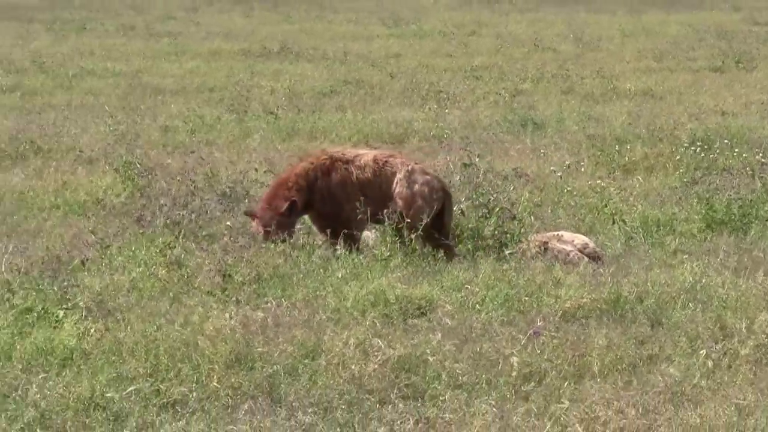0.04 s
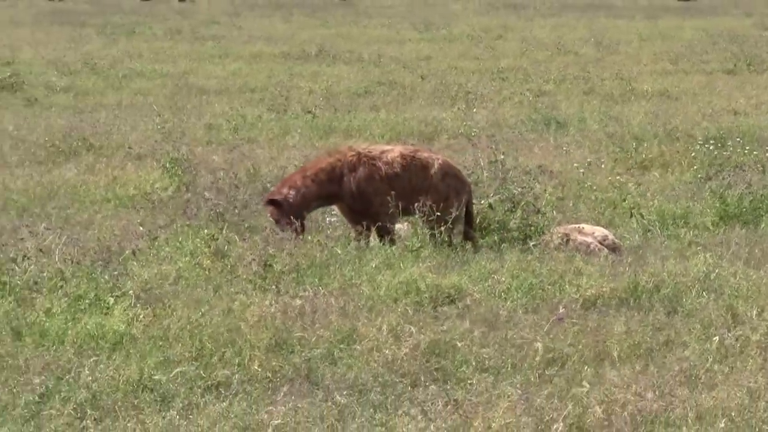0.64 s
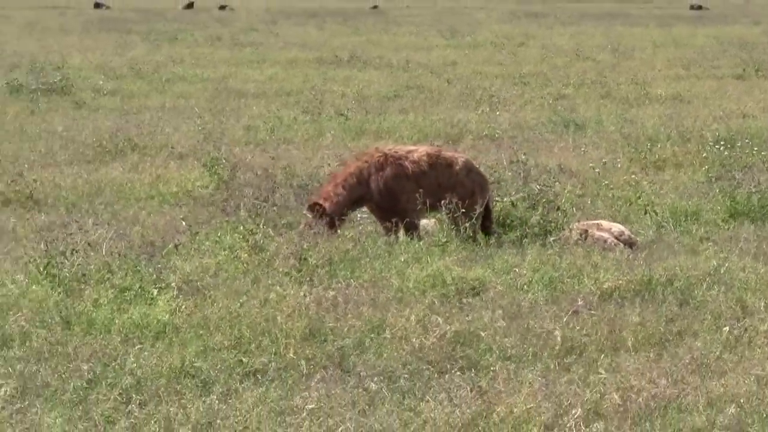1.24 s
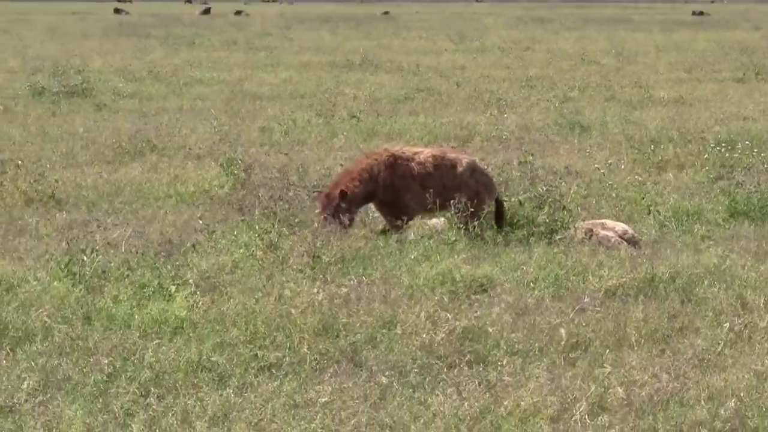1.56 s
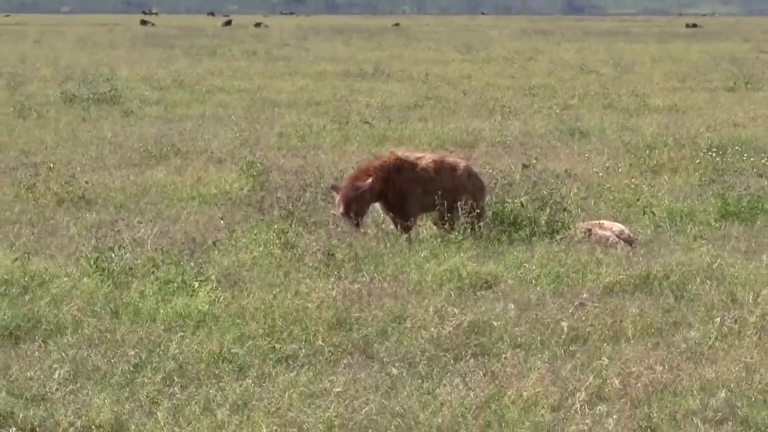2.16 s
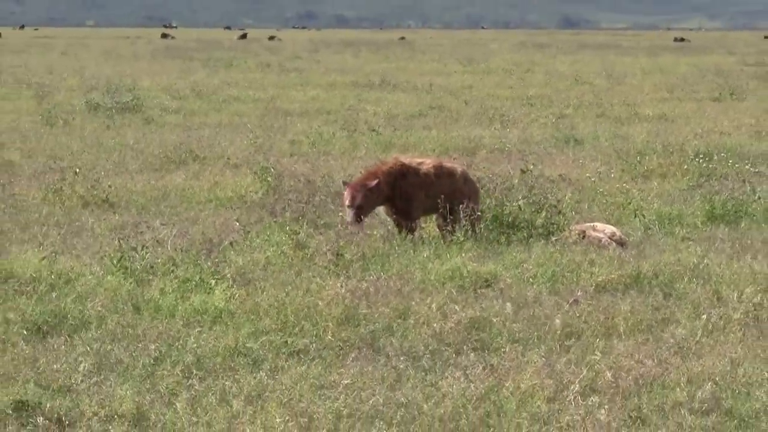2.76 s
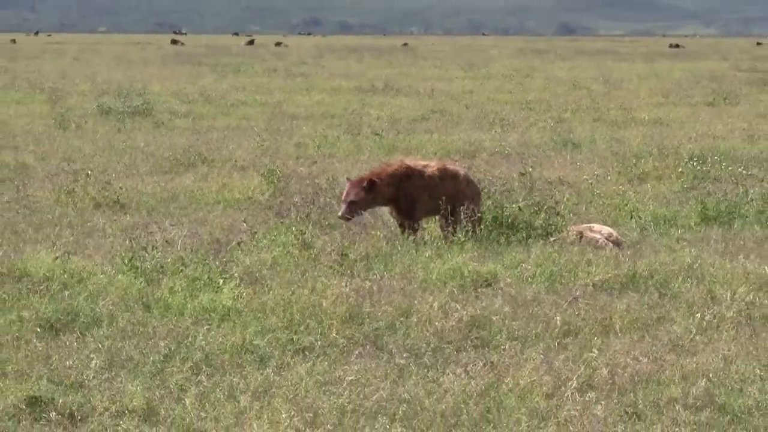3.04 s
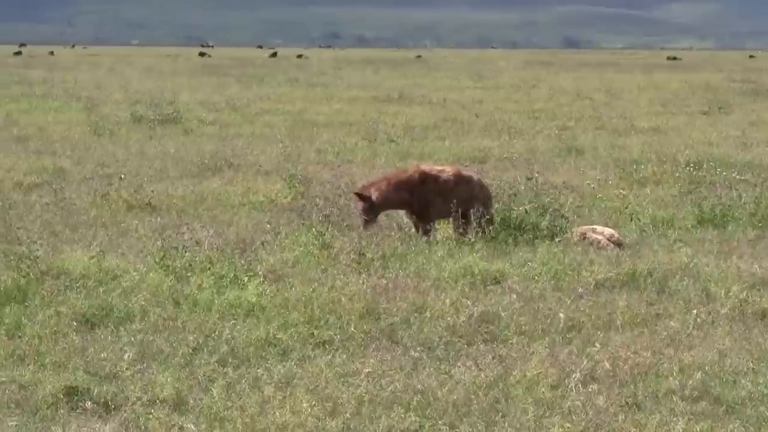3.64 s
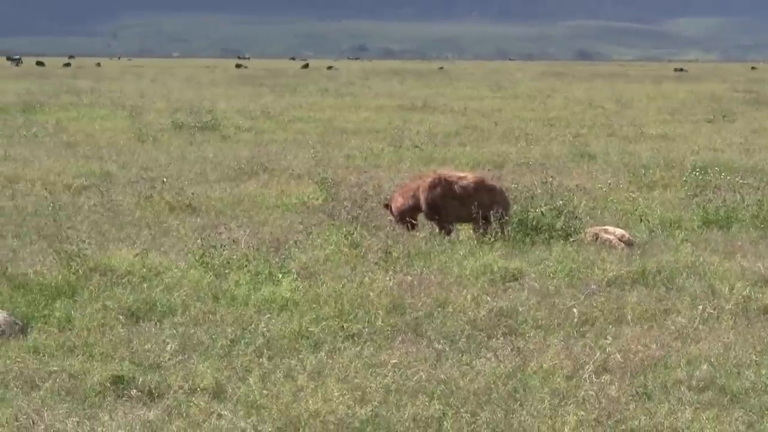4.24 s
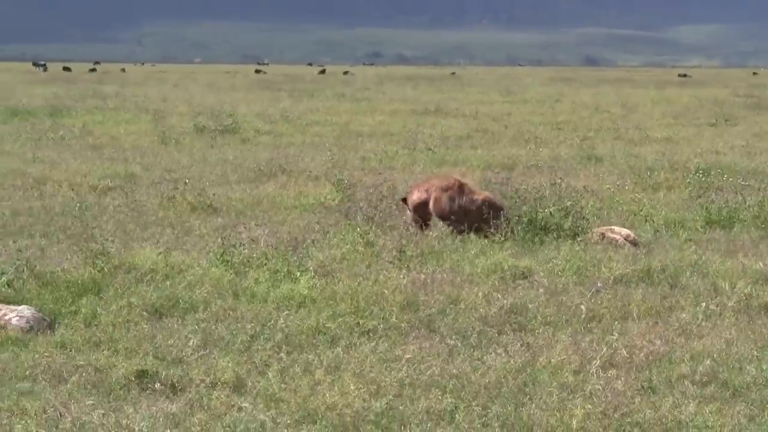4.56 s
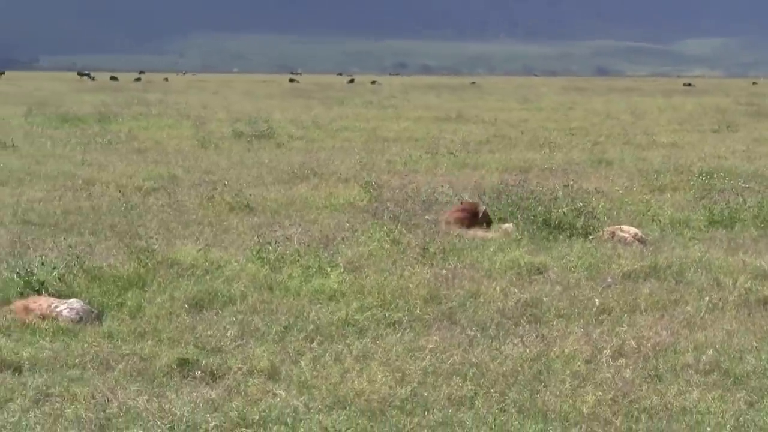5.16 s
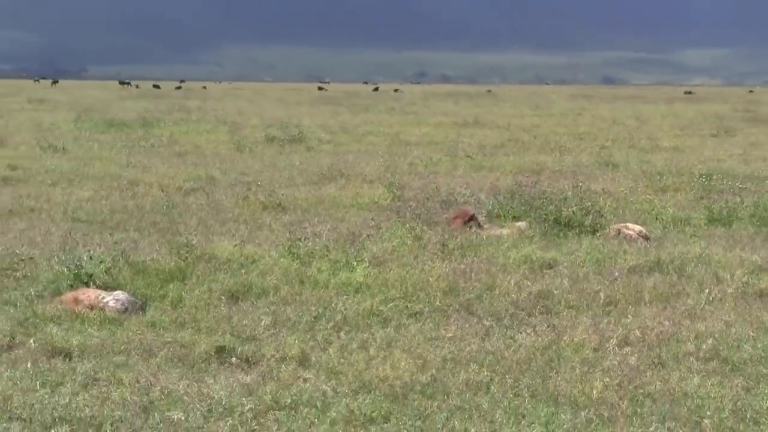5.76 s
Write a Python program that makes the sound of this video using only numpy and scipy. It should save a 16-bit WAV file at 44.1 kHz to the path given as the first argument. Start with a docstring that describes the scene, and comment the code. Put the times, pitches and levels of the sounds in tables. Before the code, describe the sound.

A soft, steady hush of air lies over open grassland. A short, low puff of wind bumps the microphone at the start, while a small, distant bird repeats a faint, high chirp until about 0.7 seconds. Weak puffs and a few thin pips follow around 1 second. From 1.5 to 2.2 seconds, gusts buffet the microphone with low flaps that jump between left and right, loudest just after 2 seconds. In the lull, the chirps return, about six a second until 3.4 seconds, joined by a long falling whistle near 2.7 seconds. More gusts flap from 3.4 to 3.7 and around 4.2 seconds, with a faint trill behind them. From about 4.5 seconds the wind drops to small puffs, and dry grass rustles and ticks very faintly. A short trill and another distant falling whistle come near 5.7 seconds.

```python
"""Wind and birds on open grassland

Light gusts carry eddies past the two ports of a camera microphone, buffeting them with low flaps.
Far off, small birds sing nearly pure tones: V-shaped chirps, short trills and long falling whistles.
Now and then dry grass blades rub together in a rustle, over the soft hush of air on the plain."""
import sys
import numpy as np
from scipy import signal
from scipy.fft import rfft, irfft
from scipy.io import wavfile
from scipy.ndimage import uniform_filter1d

SR = 44100
rng = np.random.default_rng(int(sys.argv[2]) if len(sys.argv) > 2 else 0)


def master(y):
    """Save y as 16-bit WAV."""
    cut = np.clip(np.atleast_2d(y).T, -1, 1)
    pcm = np.round(cut * 32767)  # scale
    wavfile.write(sys.argv[1], SR, pcm.astype(np.int16))


N = 264600
T = np.arange(N) / SR


def wind(turn_rad=0.99, balance_db=0.64, low_cut_hz=70):
    """Two close ports become stereo: lifting their difference and turning its phase swells the wind."""
    # Stereo widening. Each row: frequency in Hz, lift of the ports' difference in dB.
    widening = [(25, -19), (60, -5.5), (125, -1), (250, 6.5), (500, 7), (1000, 1), (2000, 4)]
    ease = np.clip(np.minimum(T, T[-1] - T) / .005, 0, 1)
    pressure = (turbulence() + eddies()) * ease
    low_cut = signal.butter(2, low_cut_hz, "high", fs=SR, output="sos")
    left, right = signal.sosfilt(low_cut, pressure) * ease
    side = colour((left - right) / 2, widening)
    side = np.real(signal.hilbert(side) * np.exp(-1j * turn_rad))
    balance = undb(np.array([[balance_db], [-balance_db]]) / 2)
    return stereo((left + right) / 2, side) * balance


def turbulence(trim_db=4.5, speed_share=.16, flap_db=1.95, flap_hz=90, strong_db=-31):
    """Air carries a frozen field of eddies past each port: faster air is louder and higher."""
    # Rumble of a strong gust. Each row: frequency in Hz, relative level in dB.
    spectrum = [(20, -7), (45, -21), (80, 6), (160, 5.5), (290, -4), (450, -19.5), (680, -32.5),
                (1100, -35), (2000, -76.5)]
    force_db = gust_db() + flap_db * walk(flap_hz)
    speed = undb(speed_share * (force_db - strong_db))
    travel = np.cumsum(speed) % N
    field = unit(colour(rng.standard_normal((2, N)), spectrum))
    ports = np.array([np.interp(travel, np.arange(N), air) for air in field])
    return undb(force_db + trim_db) * ports


def gust_db(attack_s=.007, release_s=.012, wake_db=-19, wake_s=.06, breeze_db=-73):
    """Force of the wind: puffs rise, hold and die, leaving a wake of stirred air over a steady breeze."""
    # Puffs at the microphone. Each row: start in seconds, hold in seconds, force in dB.
    puffs = [(0, 0.043, -37.5), (0.128, 0.0201, -51), (0.204, 0.015474, -50), (0.271, 0.03958, -52),
             (0.718, 0.064, -57), (0.804, .042, -47), (0.948, 0.057, -51), (1.522, 0.02459, -37),
             (1.575, 0.046, -33), (1.668, .07, -40), (1.927, 0.02458, -33), (1.985, .185, -32),
             (2.212, 0.089, -48), (2.519, .075, -48), (3.24, 0.02014, -55), (3.394, .018, -40),
             (3.467, 0.0223, -39), (3.536, 0.0464, -36), (3.59, 0.11, -33), (3.72, 0.024, -42),
             (3.924, 0.0209, -51), (4.003, 0.01553, -54), (4.148, 0.065, -33), (4.259, 0.1, -38),
             (4.629, 0.015, -42.5), (5.07, 0.0216, -47.5), (5.271, 0.055, -42.5), (5.411, .028, -43),
             (5.853, 0.0207, -49), (5.918, 0.039, -40)]
    power = undb(breeze_db) ** 2
    for start, hold, db in puffs:
        before, after = np.maximum(start - T, 0), np.maximum(T - start - hold, 0)
        puff = np.exp(-before / attack_s - after / release_s)
        wake = undb(wake_db) * np.exp(-before / attack_s - after / wake_s)
        power = power + (undb(db) * np.maximum(puff, wake)) ** 2
    return 10 * np.log10(power)


def eddies(trim_db=4.0, skirt=0.58):
    """Each strong eddy slaps one port with a swing between suction and push as it crosses."""
    # The strongest eddies. Each row: time in seconds, peak in dB before the trim, pitch in Hz,
    # port (1 left, -1 right).
    slaps = [(.835, -33, 119.9, 1), (.967, -31.5, 120, -1), (1.586, -23.5, 261, 1), (1.594, -23.5, 196, -1),
             (1.935, -15.5, 183, 1), (2.028, -20.5, 289.6, 1), (2.081, -18, 287.5, 1),
             (2.086, -11, 210, -1), (2.105, -23.5, 460, -1), (2.108, -11.5, 263, -1), (2.1261, -7, 340, -1),
             (2.156, -10, 241.5, -1), (3.403, -28.5, 182, -1), (3.586, -31, 275, 1),
             (3.647, -19.5, 310, -1), (3.666, -16.5, 204, -1), (3.688, -19, 187, 1),
             (4.154, -19.5, 323.6, 1), (4.155, -11.5, 149.5, -1), (4.167, -14, 132, 1),
             (4.172, -20, 275, -1), (4.31, -24, 249, 1)]
    ports = np.zeros((2, N))
    for at, db, hz, port in slaps:
        near = slice(*np.searchsorted(T, [at - .03, at + .03]))
        phase = np.pi * hz * (T[near] - at)
        push_pull = phase / (1 + phase ** 2 / (2 * skirt)) ** (2 * skirt + 1)
        ports[int(port < 0), near] += undb(db + trim_db) * push_pull / push_pull.max()
    return ports


def birds(chirp_db=-4, trill_db=-2.5, whistle_db=-4.0):
    """Three kinds of song from different distances, over a faint twitter."""
    return (undb(chirp_db) * far_away(chirps(), scatter_db=1.5, t60=0.087)
            + undb(trill_db) * far_away(trills(), scatter_db=-17, t60=0.18)
            + undb(whistle_db) * far_away(whistles(), scatter_db=-7.0, t60=0.13)
            + far_away(twitter(), scatter_db=-2.0, t60=0.87))


def chirps():
    """A bird repeats a chirp that dives in pitch and springs back up."""
    # The V shape. Each row: seconds from its lowest point, pitch in Hz, relative level in dB.
    shape = [(-.032, 5600, -13), (-.019, 4850, -14), (-.008, 4460, -7), (0, 4030, -1), (.007, 4270, -5.5),
             (.013, 5300, -4), (.021, 5850, -18), (.03, 5340, -8), (.036, 5100, -32)]
    # The chirps. Each row: time in seconds, relative level in dB, pitch ratio.
    notes = [(0.035, -61.5, 1.08), (.21, -66, 1.02), (0.376, -67.5, 1.1), (0.544, -61, 1.02),
             (.713, -65.5, 1.03), (1.918, -74.5, 1.3), (2.132, -69.5, 1.02), (2.314, -62.5, 1.0),
             (2.496, -62.5, 1), (2.661, -57.5, 1.01), (2.84, -60, 0.99), (3.009, -58, 0.99),
             (3.187, -63, 1), (3.372, -61.5, 1.06)]
    return series(shape, notes, quaver_hz=70.3)


def trills(last_gap_s=.054, slowing=1.1, rise_db=0.5):
    """Falling pips, alone or in runs where each gap is longer than the last and each pip louder."""
    # One pip. Each row: seconds from its middle, pitch in Hz, relative level in dB.
    shape = [(-.014, 4000, -27), (-.005, 3983, 0), (.002, 3920, 1), (.01, 3680, -1), (.017, 3450, -23)]
    # The runs. Each row: last pip's time in seconds, pip count, relative level in dB, pitch ratio.
    runs = [(.755, 1, -66.5, 1.0), (.902, 3, -72.5, .99), (1.177, 1, -71.5, 1.03), (1.876, 5, -72.5, 1.02),
            (3.849, 7, -67, .99), (4.729, 2, -70, 1.02), (5.156, 1, -68, 1.03), (5.815, 3, -70, 0.99)]
    pips = []
    for last_s, count, db, ratio in runs:
        back = np.arange(round(count))  # counted from the last pip
        gaps = last_gap_s / slowing ** back
        pips += [(last_s - gaps[:k].sum(), db - rise_db * k, ratio) for k in back]
    return series(shape, pips, quaver_hz=15)


def whistles():
    """A bird sings slurred, mostly falling whistles; a U-shaped note leads into the last."""
    # The lead-in note. Each row: time in seconds, pitch in Hz, relative level in dB.
    lead_note = [(5.641, 5420, -73), (5.652, 4410, -58), (5.662, 4350, -59.5), (5.686, 4266, -58),
                 (5.696, 5300, -68)]
    # The slurs. Each row: start and length in seconds, first and last pitch in Hz,
    # relative level in dB, quaver depth in Hz.
    slurs = [(.125, 0.078, 5850, 4650, -74, 30), (.228, .045, 4650, 3630, -72, 21),
             (1.53, 0.1, 3020, 3060, -77, 17), (2.727, .195, 4920, 3620, -64, 125),
             (2.875, 0.23, 3350, 3050, -68.5, 46), (3.08, 0.073, 3020, 2780, -72, 30),
             (3.075, .065, 3620, 3490, -71, 16.5), (5.71, 0.19, 5600, 3870, -65.5, 89)]
    lead = bird_note(*np.transpose(lead_note), quaver_hz=np.full(len(lead_note), 20))
    return lead + sum(slur(*row) for row in slurs)


def slur(start, length, first_hz, last_hz, db, quaver_hz, bend=1.5, ends_db=-8, waver=0.0072):
    """A wavering whistle glides fast, then levels out; it swells and quavers most in the middle."""
    progress = np.linspace(0, 1, 21)
    stray, flicker = rng.standard_normal((2, len(progress)))
    glide = np.expm1(-bend * progress) / np.expm1(-bend)
    hz = (first_hz + (last_hz - first_hz) * glide) * (1 + waver * stray)
    edge = (2 * progress - 1) ** 2
    level_db = db + ends_db * edge - 0.8 * flicker
    return bird_note(start + length * progress, hz, level_db, quaver_hz * (1 - edge / 2))


def twitter(count=40, level_db=-82, spread_db=3, low_hz=2400, high_hz=4100, longest_s=0.083, slide=0.13):
    """The farthest birds: stray short slurs that barely rise out of the hush."""
    out = np.zeros(N)
    for when, length, pitch, glide, loud in rng.random((count, 5)):
        times = when * T[-1] + longest_s * (1 + length) / 2 * np.array([0, .5, 1])
        centre_hz = low_hz + pitch * (high_hz - low_hz)
        hz = centre_hz * (1 + slide * (glide - .5) * np.array([-1, 0, 1]))
        db = level_db + spread_db * loud + np.array([-10, 0, -10])
        out += bird_note(times, hz, db, quaver_hz=hz * 0.012)
    return out


def series(shape, notes, quaver_hz, pitch_scatter=.015):
    """A bird repeats one note shape at varying level and pitch, never quite the same twice."""
    times, hz, db = np.transpose(shape)
    strays = 1 + pitch_scatter * rng.standard_normal((len(notes), len(times)))
    return sum(bird_note(at + times, hz * ratio * stray, db + level_db, np.full(len(times), quaver_hz))
               for (at, level_db, ratio), stray in zip(notes, strays))


def bird_note(times, hz, db, quaver_hz, quaver_rate_hz=128, fade_s=.003):
    """A nearly pure tone follows a pitch and level contour, with a fast quaver quaver_hz deep."""
    out = np.zeros(N)
    on = (T > times[0]) & (T < times[-1])
    t = T[on]
    quaver = np.sin(2 * np.pi * (quaver_rate_hz * t + rng.random()))
    pitch = np.interp(t, times, hz) + np.interp(t, times, quaver_hz) * quaver
    tone = np.sqrt(2) * np.sin(2 * np.pi * np.cumsum(pitch) / SR)
    fade = np.clip(np.minimum(t - times[0], times[-1] - t) / fade_s, 0, 1)
    out[on] = fade * undb(np.interp(t, times, db)) * tone
    return out


def far_away(song, scatter_db, t60, width=.35):
    """Moving air makes a far call flicker; grass and bushes scatter a short tail after it."""
    song = song * undb(1.2 * walk(70))
    t = T[:SR // 2]
    envelope = np.exp(-np.log(1000) * t / t60) * (1 - np.exp(-t / 0.0027))
    tail = rng.standard_normal((2, len(t))) * envelope
    tail /= np.sqrt(np.sum(tail ** 2, axis=1, keepdims=True))
    mid, side = signal.fftconvolve(song[None], tail, axes=1)[:, :N] * undb(scatter_db)
    return stereo(song + mid, width * side)


def grass(grain_db=3, flutter_db=1.7, width=0.34):
    """Dry blades rub in countless tiny ticks, stalks snap and brush, and distant air swells once."""
    # Colour of the blades. Each row: frequency in Hz, relative level in dB.
    spectrum = [(1500, -13), (3500, -3.5), (6000, -9), (7800, -8.5), (9000, -9), (10500, -14),
                (11500, -18.5), (15500, -34)]
    # Swells of rustling. Each row: peak time and half length in seconds, level in dB,
    # thin sizzle in dB relative to the blades.
    rustles = [(0.607, 0.13, -86, -12), (1.784, 0.094, -79.5, -4), (2.354, 0.18, -82.5, -15),
               (3.748, 0.13, -77.5, -20), (4.3, 0.24, -78, -17), (4.813, 0.11, -72, -10.5),
               (5.196, 0.15, -74.5, 0), (5.849, 0.41, -75.5, -18)]
    # Stalk snaps and brushes, and a soft mid-pitched swell of distant air at 1.137 s.
    # Each row: time in seconds, level in dB, half length in seconds, centre in Hz.
    accents = [(0.925, -58.5, 0.0013, 3520), (1.137, -74, 0.12, 1570), (4.685, -71, 0.0022, 5007),
               (4.791, -73.5, 0.026, 3600), (5.056, -70.5, 0.019, 4700), (5.182, -79, 0.0123, 6600),
               (5.48, -72, .035, 1800)]
    ticks = rng.standard_normal((2, N)) * undb(grain_db * rng.exponential(size=N))
    blades = unit(colour(ticks, spectrum))
    sizzle = band(rng.standard_normal((2, N)), hz=9250, q=3.5)
    out = sum(undb(db) * swell(at, half_s) * (blades + undb(sizzle_db) * sizzle)
              for at, half_s, db, sizzle_db in rustles)
    out *= undb(flutter_db * walk(22.94))
    for at, db, half_s, hz in accents:
        out += undb(db) * band(ticks, hz, q=1.1) * swell(at, half_s)
    return stereo(out[0], width * out[1])


def hush(level_db=-58, swell_db=0.6):
    """Distant air over the plain, smooth and slowly swelling."""
    # Colour of the hush. Each row: frequency in Hz, relative level in dB.
    spectrum = [(15, -34), (25, 13), (96, 0.5), (136, 0), (209, -2.5), (281, -3), (331, -5), (567, -7),
                (666, -8.5), (1050, -10.5), (1570, -12), (2560, -16.5), (4040, -19), (5010, -22.5),
                (15500, -37.5)]
    # Its width. Each row: frequency in Hz, side level relative to mid in dB.
    width = [(60, -12.5), (110, -14.5), (200, 1), (380, 4), (700, 3), (1290, -1), (2380, -3.5), (4400, -4),
             (8120, -2.5), (15000, 1)]
    mid, side = colour(rng.standard_normal((2, N)), spectrum)
    air = unit(stereo(mid, colour(side, width)))
    return air * undb(level_db + swell_db * walk(4.5))


def undb(db):
    """Decibels to gain."""
    return 10 ** (np.asarray(db) / 20)


def unit(x):
    """Scale to rms 1."""
    return x / np.sqrt(np.mean(x ** 2))


def colour(x, points):
    """Equalise a sound with a curve of (Hz, dB) points, joined on a log-frequency axis."""
    hz, db = np.transpose(points)
    bins_hz = np.maximum(np.arange(N // 2 + 1) * SR / N, 1)
    gain = undb(np.interp(np.log(bins_hz), np.log(hz), db))
    return irfft(rfft(x) * gain, N)


def band(x, hz, q):
    """Two passes through a two-pole band-pass, scaled to rms 1."""
    b, a = signal.iirpeak(hz, q, fs=SR)
    return unit(signal.lfilter(b, a, signal.lfilter(b, a, x)))


def walk(rate_hz):
    """Smooth random wander with spread 1, changing about rate_hz times a second."""
    step = int(SR / rate_hz)
    held = np.repeat(rng.standard_normal(N // step + 1), step)
    return unit(uniform_filter1d(uniform_filter1d(held, step), step)[:N])


def swell(at, half_s):
    """A bell-shaped rise and fall around a moment."""
    return np.exp(-.5 * ((T - at) / half_s) ** 2)


def stereo(mid, side):
    """Left and right from their sum and difference parts."""
    return np.array([mid + side, mid - side])


def scene():
    """Wind on the microphone, in front of the plain and its birds."""
    return wind() + hush() + grass() + birds()


def record(dry, top_hz=15750):
    """The camera cuts the highest treble steeply."""
    return signal.sosfilt(signal.ellip(10, .2, 70, top_hz, fs=SR, output="sos"), dry)


dry = scene()
out = record(dry)
master(out)
```